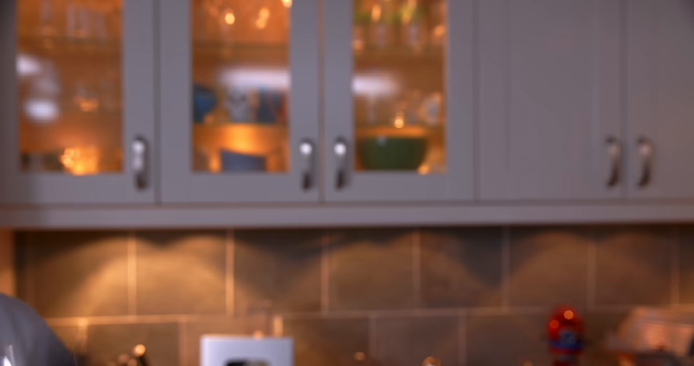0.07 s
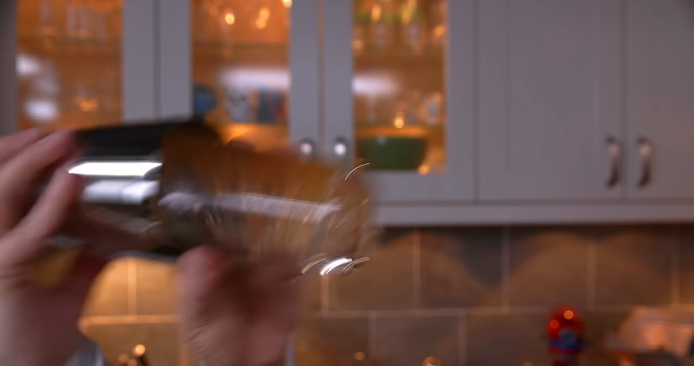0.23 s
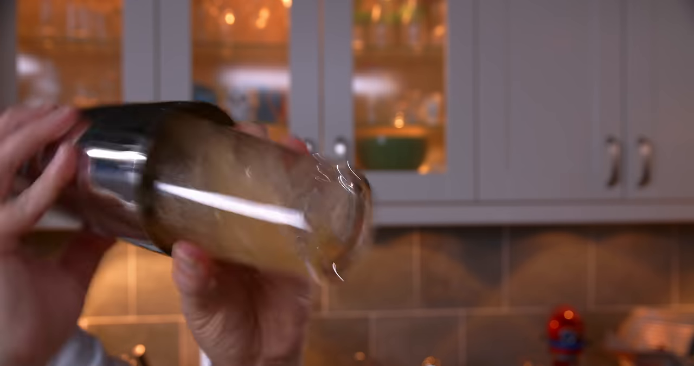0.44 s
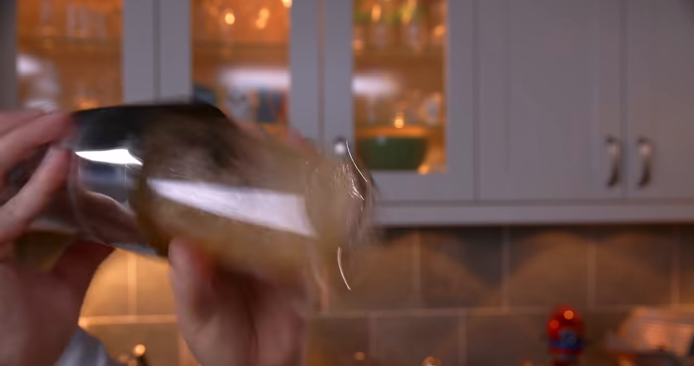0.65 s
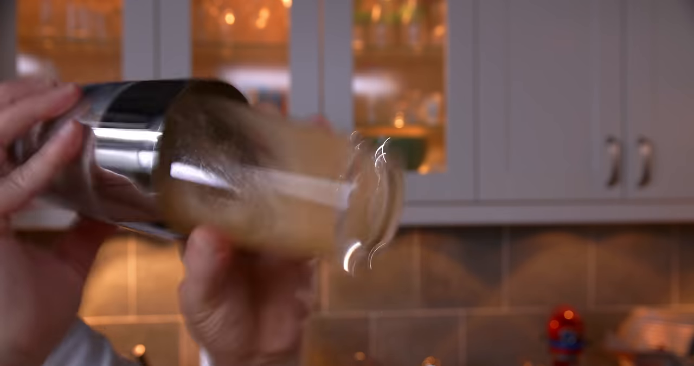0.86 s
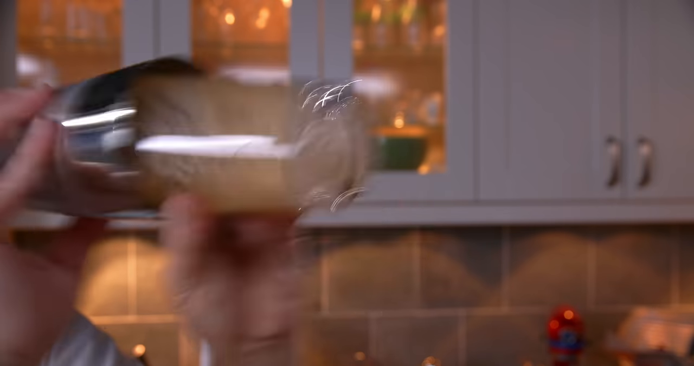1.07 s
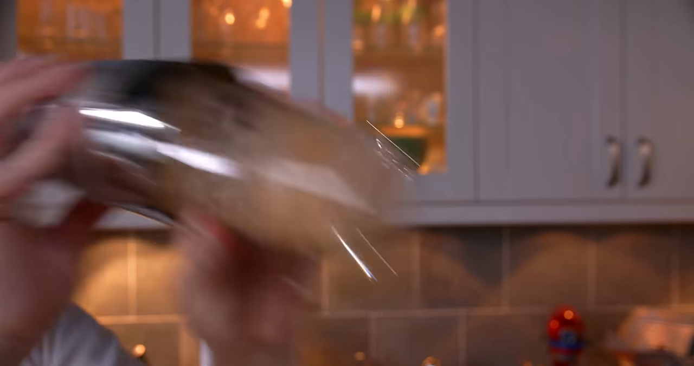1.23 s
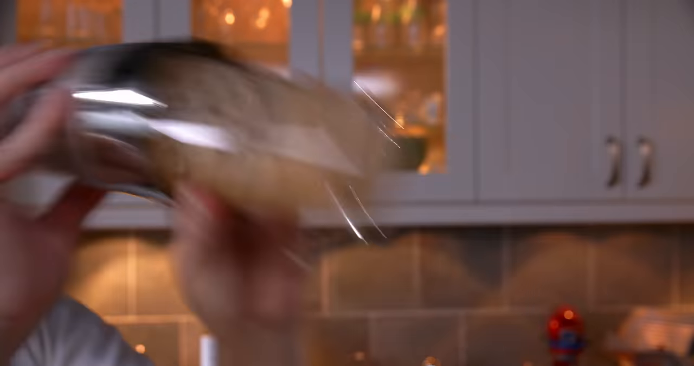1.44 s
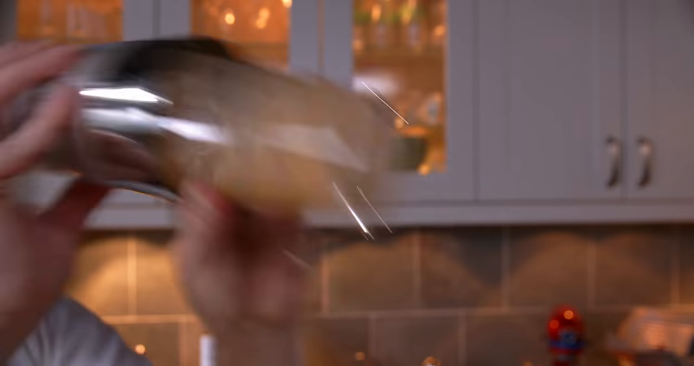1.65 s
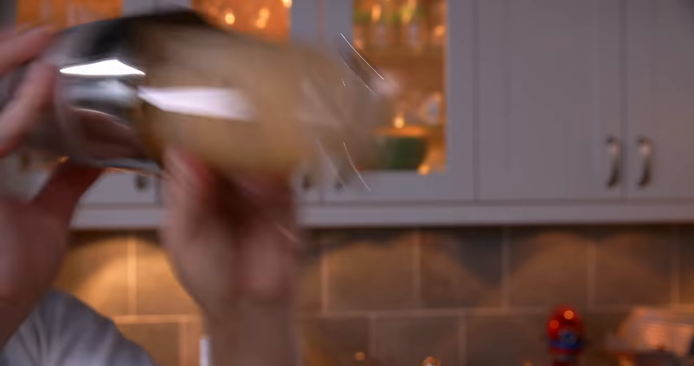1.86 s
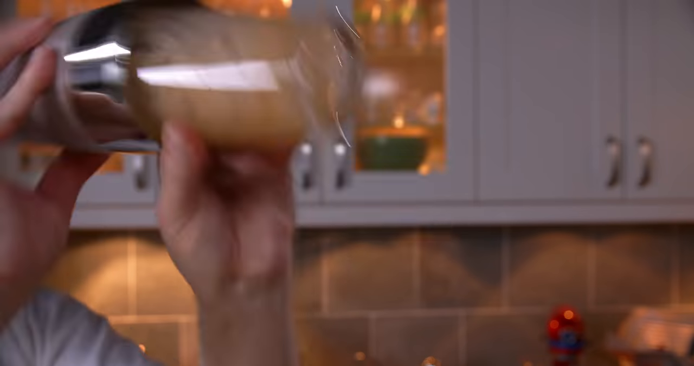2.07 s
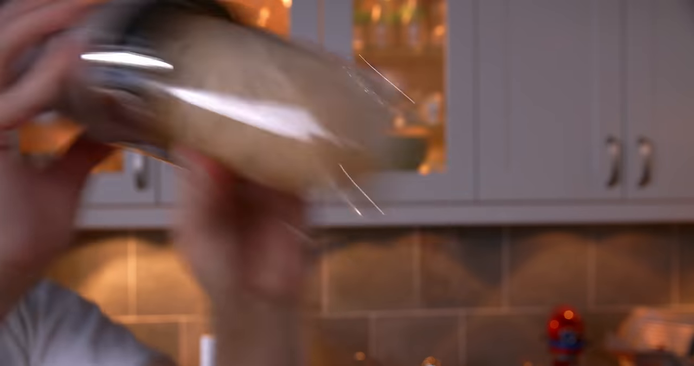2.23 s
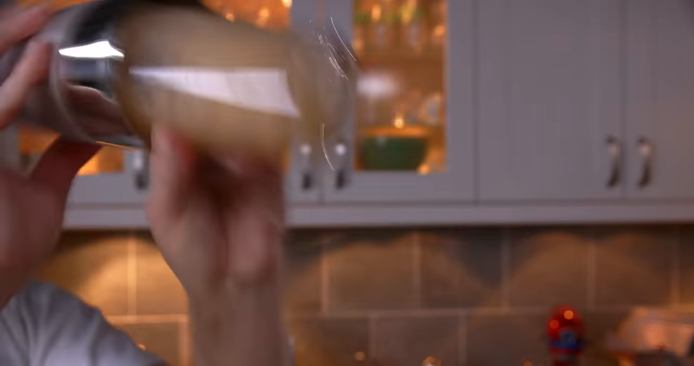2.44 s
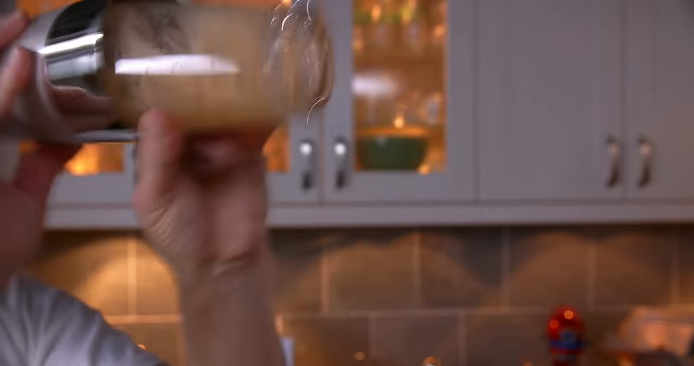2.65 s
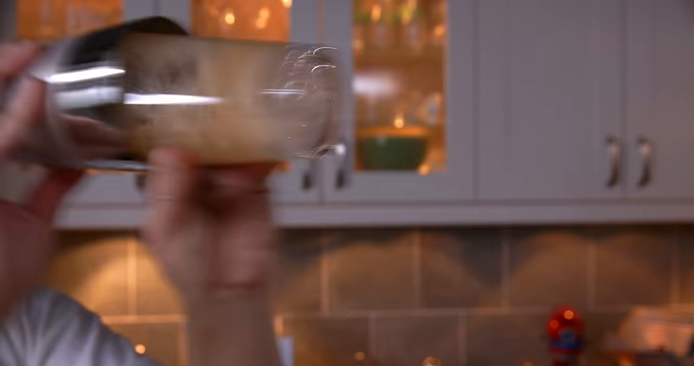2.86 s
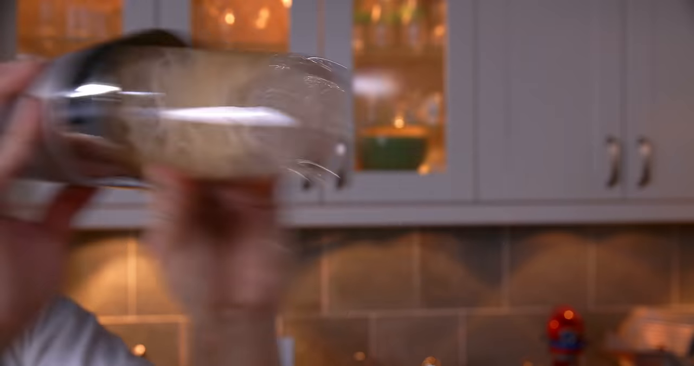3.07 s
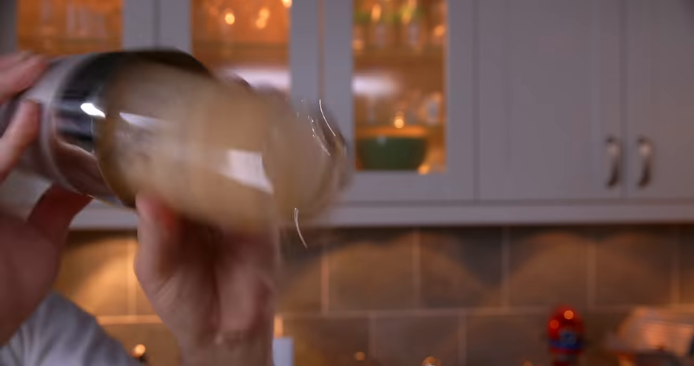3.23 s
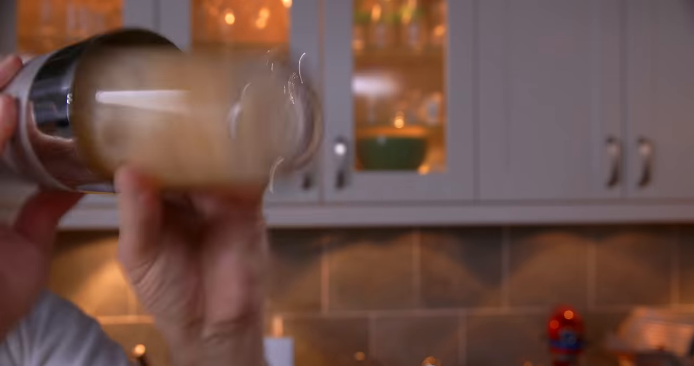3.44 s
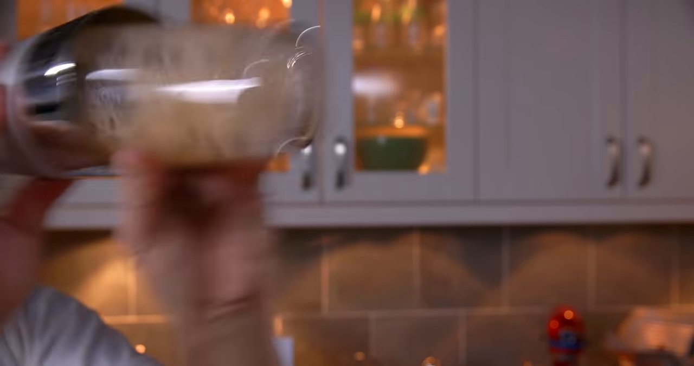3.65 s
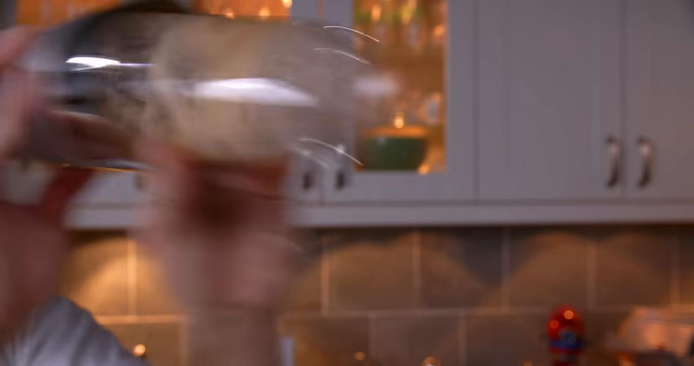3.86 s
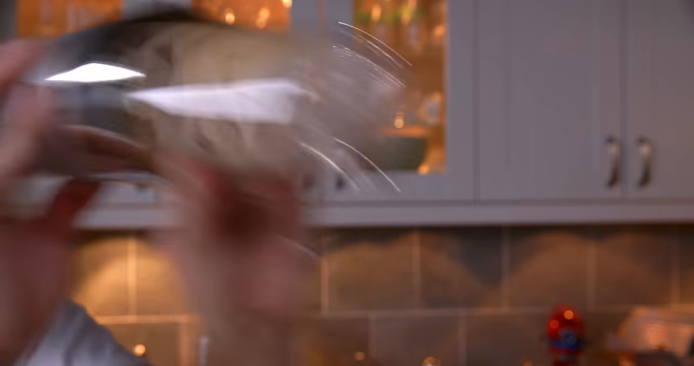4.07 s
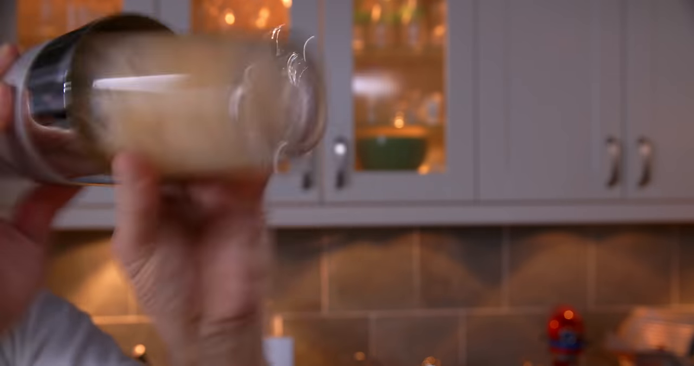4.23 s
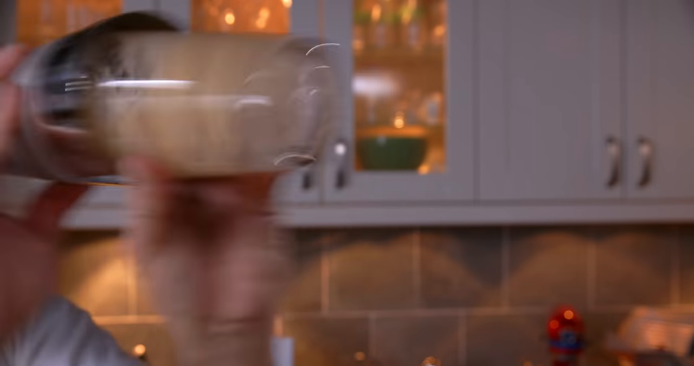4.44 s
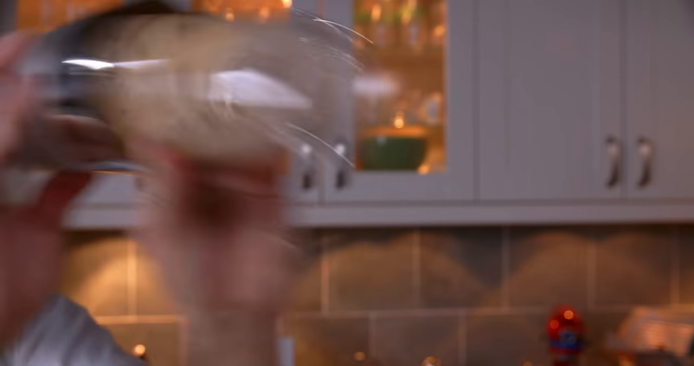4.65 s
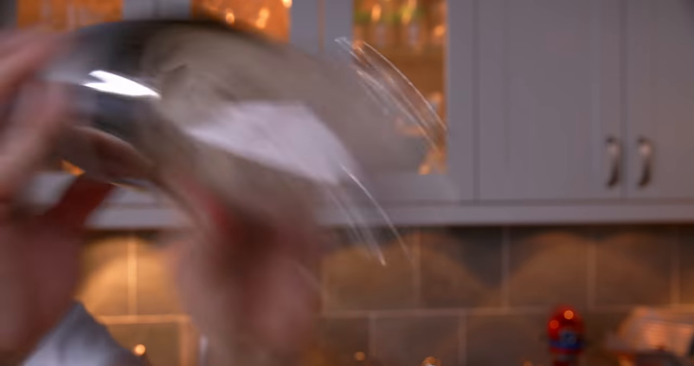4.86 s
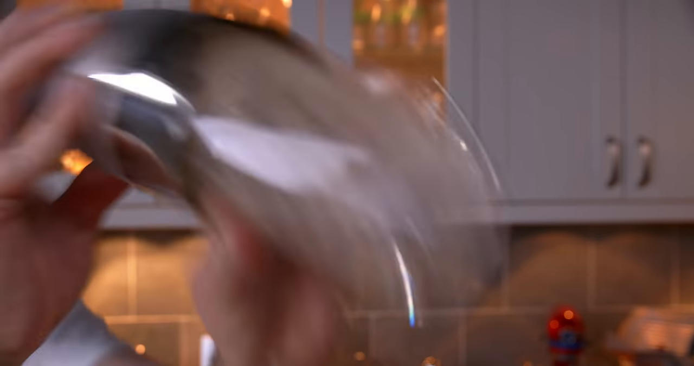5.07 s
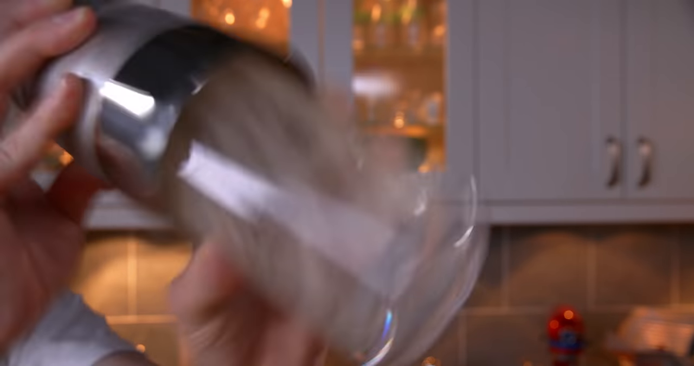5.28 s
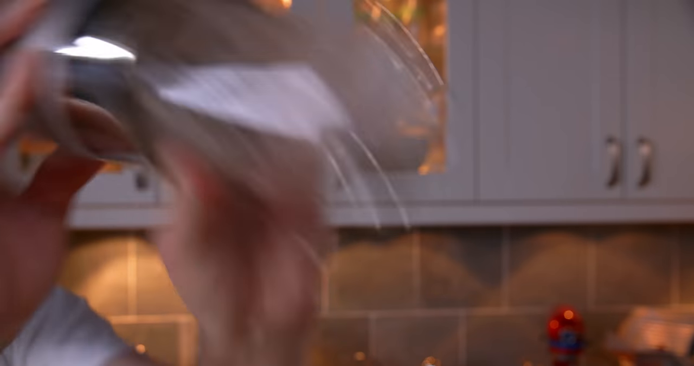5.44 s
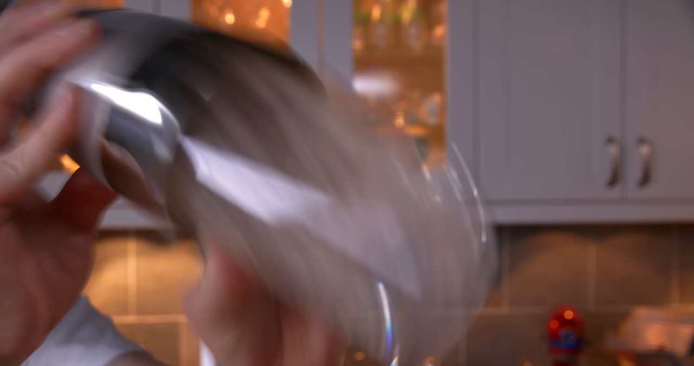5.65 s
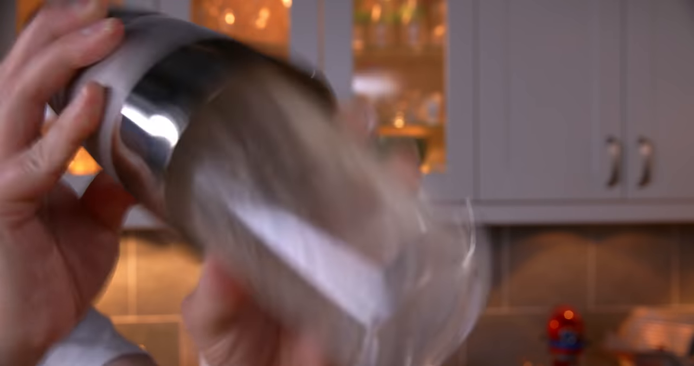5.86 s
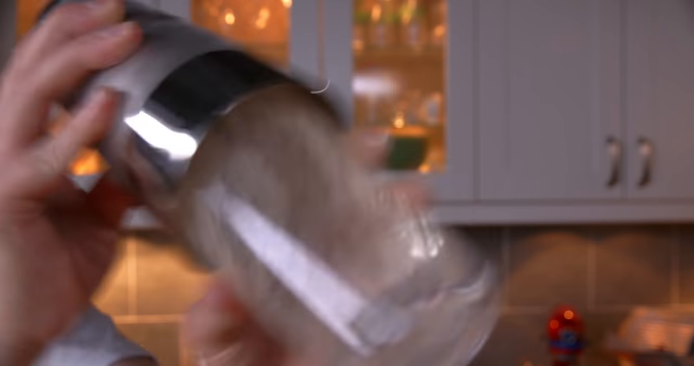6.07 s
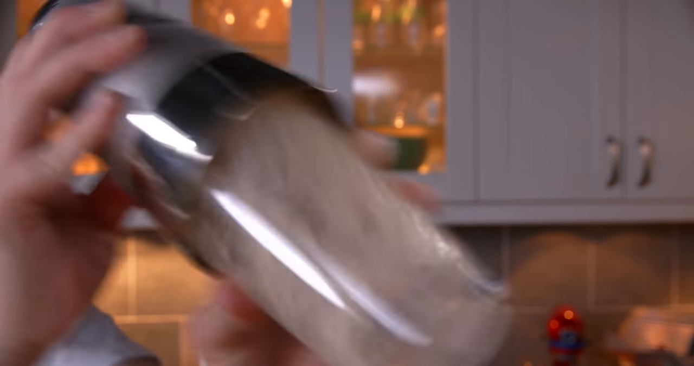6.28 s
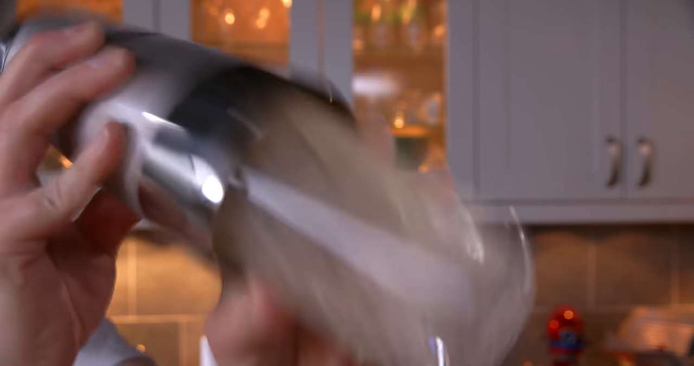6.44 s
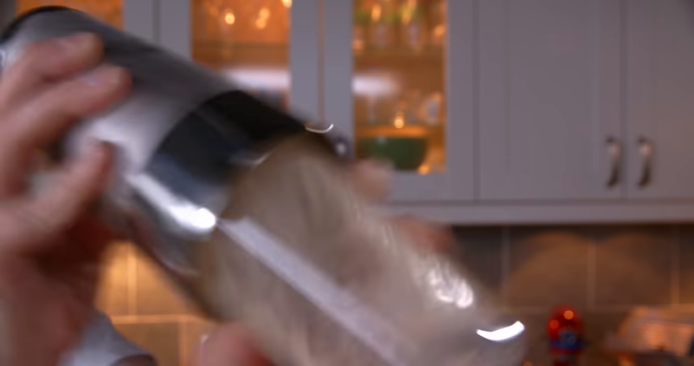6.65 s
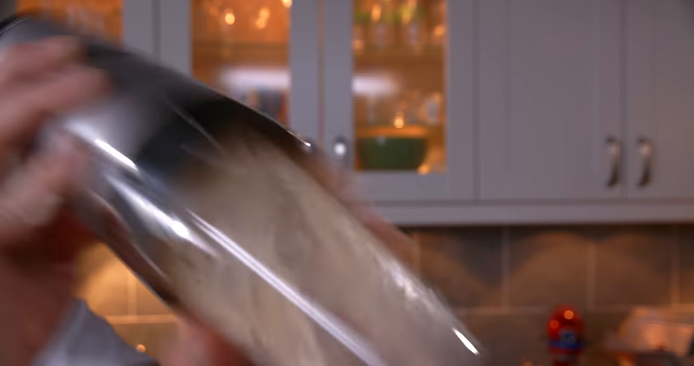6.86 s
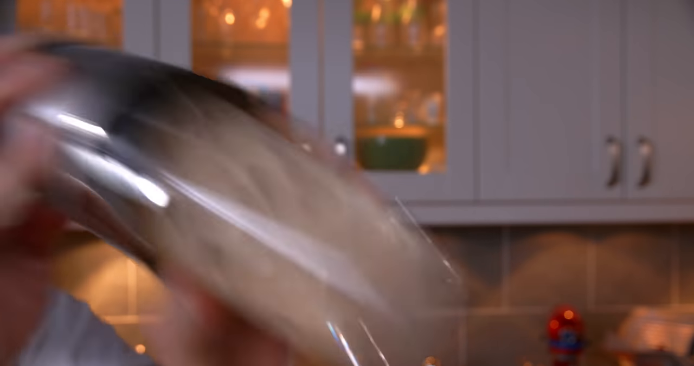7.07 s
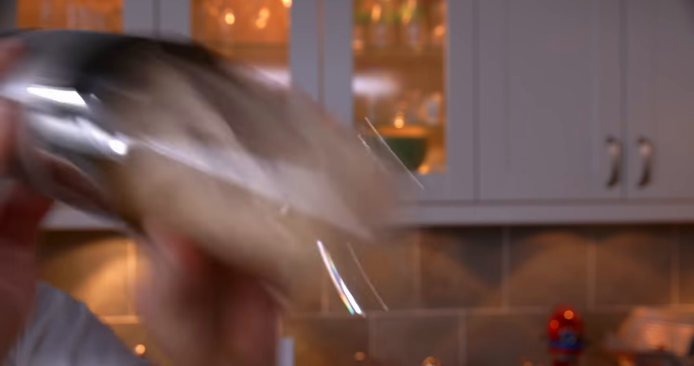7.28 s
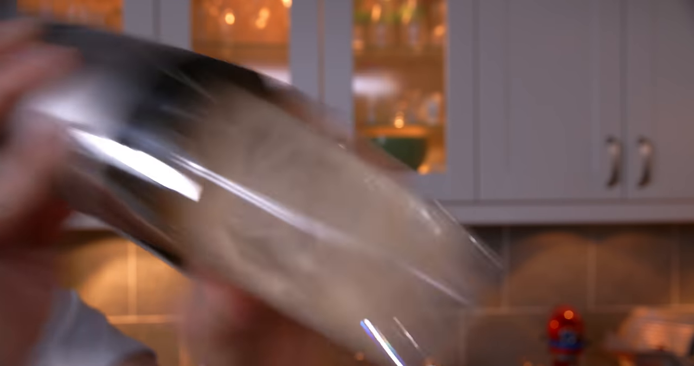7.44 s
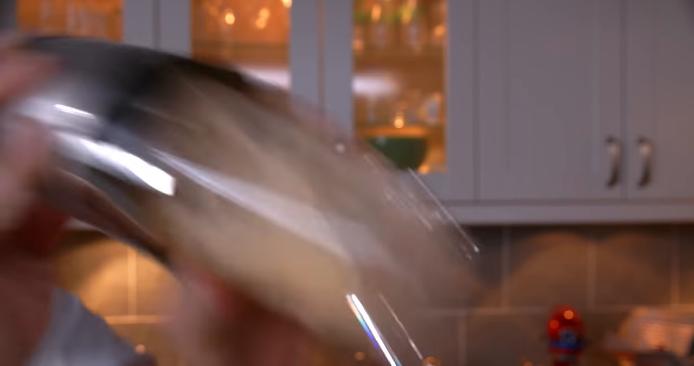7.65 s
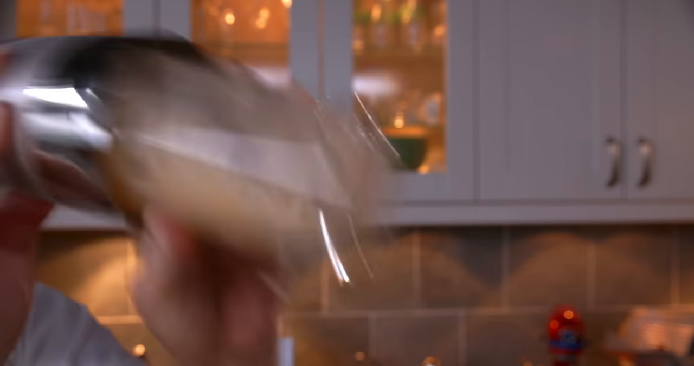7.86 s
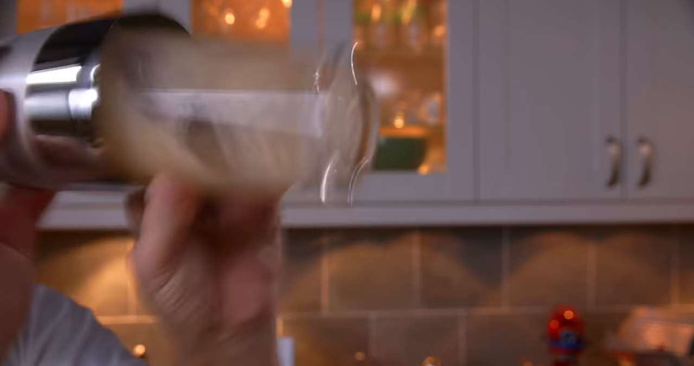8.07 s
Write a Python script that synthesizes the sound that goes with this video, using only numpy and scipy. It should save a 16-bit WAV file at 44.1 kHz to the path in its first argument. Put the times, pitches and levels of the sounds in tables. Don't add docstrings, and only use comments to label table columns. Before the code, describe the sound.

In a small, quiet kitchen, a hand-held metal tin capped by a glass and full of ice and drink is shaken hard, close to the microphone. From 0 to 0.3 seconds there is only faint room hush, tiny loose ice ticks and a brief soft rub along the wall. At about 0.35 the shaking bursts in and stays at roughly five shakes a second until the end near 8 seconds. Every shake has two hits about a tenth of a second apart, a louder throw and a softer return, each a dense shower of bright clicks around 2 to 9 kHz. Irregular cube slams, splintering cracks and hollow clunks stand out, with short damped metallic ringing near 3 kHz. Tumbling ice and slosh fill the gaps. Early strokes are sharpest; later ones slightly softer and slushier. Soft low air pushes lie beneath; the room tail is very short.

```python
import sys
import numpy as np
from scipy import signal
from scipy.fft import rfft, irfft
from scipy.io import wavfile

SR = 44100
rng = np.random.default_rng(int(sys.argv[2]) if len(sys.argv) > 2 else 0)


def to_wav(sig):
    pcm = np.clip(np.atleast_2d(sig), -1, 1) * 32767
    pcm = np.round(pcm).astype(np.int16)
    wavfile.write(sys.argv[1], SR, pcm.T)


def gain_from_decibels(decibels):
    exponent = np.asarray(decibels, float) / 20
    return 10 ** exponent


N = 357651

# frequency in Hz, density in dB per Hz.
HUSH_SPECTRUM = [(18, -55), (30, -12), (215, -3.5), (913, -19.5), (1460, -19), (7870, -26), (11100, -34),
                 (12300, -27), (16000, -54)]
# time in seconds, peak in dB.
JOLTS = [(1.039, -56), (1.345, -50), (1.541, -53), (1.903, -56), (1.992, -45), (2.344, -56.0), (2.53, -45),
         (2.725, -46), (2.96, -57.0), (3.144, -48), (3.462, -59), (3.717, -51), (4.306, -50.5),
         (4.503, -49), (4.701, -49), (4.893, -44), (5.084, -46), (5.279, -44), (5.465, -43), (5.659, -43),
         (6.242, -45), (6.439, -62), (6.632, -46), (7.014, -50), (7.206, -46), (7.399, -49), (7.589, -43),
         (7.97, -47)]
# time in seconds, level in dB.
SLIDE = [
    (.02, -73),
    (.13, -72),
    (.165, -51),
    (.22, -69),
    (.25, -45.5),
    (.33, -54),
    (.36, -71),
]
# frequency in Hz, bandwidth in Hz, level in dB.
FREE_WALL = [(1540, 87, -17), (2560, 26, -14), (2830, 55, -9), (3250, 72, -11.5), (4800, 570, -14)]
# time in seconds, level in dB.
TUMBLE = [(0, -64), (.1, -60), (.21, -52), (.295, -54), (.31, -33.5), (.45, -37), (.9, -29.5), (2, -33.5),
          (3, -32.5), (4, -30.5), (5.1, -34), (5.5, -33), (6.002, -32), (7, -34), (8.11, -33)]
# frequency in Hz, density in dB per Hz.
ICE_SPECTRUM = [(590, -44), (1000, -50), (1460, -35), (1620, -14), (1880, -3.5), (2190, -19.5), (3350, 4.5),
                (3810, -10), (9350, 1.5), (15700, -23)]
# frequency in Hz, density in dB per Hz.
DULL_SPECTRUM = [(88, -53), (150, -32), (308, -29), (441, -9), (625, -26), (906, 0.5), (1050, -19),
                 (1450, -1), (2200, -7.5), (2860, -47), (4840, -120)]
# frequency in Hz, level in dB, 60 dB decay time in seconds.
SHELL_MODES = [(1380, -14.5, 0.015), (1470, -22.5, 0.044), (1850, -13.5, 0.027), (2480, -14.5, 0.026),
               (2864, -7, 0.018), (3286, -11.5, 0.086), (3423, -4.5, 0.012), (4030, 2, 0.0035),
               (5100, -0.5, 0.0054), (6430, -3, 0.0034), (7600, -14, 0.022)]
# fall back of the ice into the tin in seconds, throw into the glass in dB, fall back in dB.
ARM = [(0.358, -14, -23), (0.968, -17, -20), (1.579, -14.5, -18.5), (2.181, -14.5, -21.5),
       (2.757, -16, -19), (3.359, -16.5, -20.5), (3.937, -16.5, -24), (4.539, -15, -22),
       (5.107, -19.5, -25.5), (5.676, -14.5, -20.5), (6.282, -19, -26), (6.839, -15.5, -21),
       (7.409, -18, -22.5), (7.99, -17, -26)]
# middle in seconds, hold in seconds, level above that rule in dB.
ODD_LOADS = [(0.455, 0.042, -1), (0.67, 0.045, -4), (0.359, 0.011, 2), (0.867, 0.078, 1.5),
             (0.964, 0.015, -4.5), (1.05, 0.055, 0.5), (1.17, 0.016, -2), (1.779, 0.01, -0.5),
             (1.98, 0.063, 0), (2.188, 0.045, 1), (2.567, 0.022, -1.5), (2.657, 0.043, -2),
             (3.449, 0.057, 0), (3.642, 0.053, 1.5), (3.737, 0.0063, -1.5), (4.037, 0.032, -0.5),
             (4.336, 0.029, 1), (4.624, 0.061, -2.5), (5, 0.074, 1), (5.304, 0.023, 3.5),
             (5.384, 0.054, 0.5), (5.667, 0.0062, -4.5), (6.159, 0.058, 0), (6.353, 0.028, 0),
             (6.473, 0.028, -2.5), (6.743, 0.038, -2.5), (7.12, 0.053, -0.5), (7.311, 0.033, -0.5),
             (7.505, 0.018, -1.5), (7.886, 0.06, -2.5)]
# time in seconds, level in dB.
CLACKS = [(0.3523, -12), (0.4395, -11), (0.471, -11), (0.5334, -13), (0.5748, -15), (0.6433, -15),
          (0.6503, -13.5), (0.6747, -7), (0.6909, -15), (0.6969, -11), (0.7095, -15), (0.7193, -25),
          (0.7796, -8.5), (0.8504, -10), (0.859, -10), (0.8762, -7), (0.8865, -9), (0.9051, -12),
          (0.9151, -15), (0.9281, -18), (0.9498, -8.5), (0.9625, -19), (0.9767, -12), (1.0137, -15),
          (1.0272, -14), (1.0398, -17), (1.1614, -19), (1.2145, -23), (1.2228, -11), (1.2458, -22),
          (1.2676, -8), (1.2788, -8), (1.3036, -13), (1.3126, -20), (1.3239, -12.5), (1.3562, -14),
          (1.3678, -16), (1.3994, -21), (1.4457, -6), (1.4602, -10), (1.5266, -9), (1.5618, -7),
          (1.5991, -11.5), (1.6062, -17), (1.6239, -32), (1.6504, -24), (1.6892, -7), (1.7, -10),
          (1.7197, -15), (1.7305, -16), (1.767, -14), (1.7767, -24), (1.8014, -11.5), (1.9258, -13),
          (1.9497, -23), (1.96, -15), (1.9995, -7), (2.0408, -23), (2.048, -20), (2.0802, -8),
            (2.1044, -11), (2.1147, -15), (2.1791, -13), (2.194, -17), (2.2317, -18), (2.2457, -22),
            (2.2723, -16), (2.2865, -14), (2.2983, -8), (2.3395, -13.5), (2.373, -16), (2.4467, -18),
            (2.457, -10), (2.5279, -13.5), (2.574, -22), (2.5834, -21), (2.6342, -8), (2.7418, -11.5),
            (2.8335, -28), (2.8522, -11), (2.8623, -10), (2.98, -30), (3.005, -11), (3.0096, -17),
            (3.0536, -14), (3.0836, -16), (3.096, -16), (3.108, -11.5), (3.172, -15), (3.216, -11),
            (3.225, -17), (3.2466, -6), (3.2868, -11), (3.3285, -13.5), (3.3483, -23), (3.4105, -10.5),
            (3.5307, -17), (3.57, -17), (3.6178, -13), (3.65, -18), (3.6824, -12), (3.6972, -13.5),
            (3.747, -18.5), (3.7556, -15), (3.8224, -15), (3.884, -14.5), (3.9167, -13), (3.96, -14),
          (4.1327, -13), (4.201, -13), (4.2214, -8), (4.232, -12), (4.239, -20), (4.282, -11),
            (4.3323, -9.5), (4.3473, -18), (4.4006, -20), (4.4198, -19), (4.429, -20), (4.448, -12),
            (4.5422, -14), (4.5883, -12.5), (4.6264, -14), (4.644, -20), (4.6855, -15), (4.723, -22),
            (4.7321, -20), (4.8065, -16), (4.828, -10), (4.903, -17), (4.9199, -14.5), (4.9748, -25),
            (4.9991, -12), (5.05, -19), (5.073, -25), (5.0951, -13.5), (5.11, -21), (5.17, -23),
            (5.1976, -6), (5.3114, -24), (5.3427, -15), (5.374, -15), (5.3826, -16), (5.3933, -9),
            (5.412, -13), (5.4173, -15), (5.4469, -14), (5.4703, -16), (5.4842, -17), (5.557, -16),
            (5.567, -8), (5.5793, -11), (5.6412, -12.5), (5.6839, -11.5), (5.749, -27), (5.768, -16),
            (5.7843, -11), (5.8005, -17), (5.8136, -15.5), (5.8579, -22), (5.8908, -27), (5.9894, -19),
          (5.9994, -27), (6.0338, -16.5), (6.0566, -13), (6.0818, -15), (6.1, -18), (6.2074, -12),
            (6.2758, -16.5), (6.3299, -13.5), (6.3593, -12), (6.3714, -9), (6.4567, -16), (6.5236, -16),
            (6.5327, -18), (6.5411, -9), (6.5677, -15), (6.5791, -23), (6.5953, -16), (6.6105, -22),
            (6.6255, -14), (6.646, -18), (6.666, -24), (6.6848, -23), (6.766, -14), (6.795, -19),
            (6.832, -7.5), (6.8516, -18), (6.871, -18), (6.915, -19), (6.9298, -11), (6.9484, -18),
            (6.966, -19), (6.9992, -22), (7.0287, -23), (7.1072, -15), (7.1255, -9), (7.2067, -21),
            (7.2916, -17), (7.401, -23), (7.4166, -24), (7.431, -19), (7.476, -12.5), (7.5168, -18),
            (7.5414, -18), (7.6091, -25), (7.6791, -9.5), (7.7059, -11), (7.722, -13), (7.7631, -14.5),
            (7.8966, -14), (7.9046, -13), (7.9544, -15), (8.0527, -17), (8.085, -22), (8.0967, -14)]
# time in seconds, peak in dB, pitch in Hz.
THUMPS = [(0.35, -28, 934), (0.427, -19, 770), (0.546, -25, 786), (1.33, -20, 860), (1.428, -18, 804),
          (1.751, -27, 942), (1.854, -12.5, 930), (2.045, -22, 724), (2.165, -20, 820), (2.54, -21, 947),
          (2.678, -16, 805), (2.962, -21, 770), (3.551, -19, 705), (3.736, -28, 947), (4.331, -28, 759),
          (4.731, -33, 902), (5.297, -18, 835), (5.49, -18, 821), (5.667, -13, 865), (5.978, -17, 851),
          (6.067, -14, 900), (6.722, -24, 820), (7.512, -14, 1070), (8.038, -20.5, 930),
          (0.466, -18, 800), (0.844, -22, 649), (0.894, -29, 816), (1.035, -26, 678), (1.065, -19, 818),
         (1.17, -24, 683), (1.255, -17, 817), (1.287, -30, 734), (1.365, -20, 815), (1.444, -22, 767),
         (1.657, -20, 765), (2.064, -27, 756), (2.372, -20, 700), (2.44, -20, 750), (2.588, -23, 730),
         (2.643, -19, 725), (3.034, -27, 655), (3.629, -26, 773), (4.331, -19, 740), (4.433, -20, 722),
         (5.669, -21, 590), (7.208, -23, 773), (7.406, -23, 810), (8.057, -29, 750)]
# time in seconds, peak in dB, pitch in Hz.
CLUNKS = [(0.1654, -25, 1560), (0.3624, -17, 1570), (0.4261, -14, 1930), (1.1448, -8, 1530),
          (1.3663, -10, 1470), (1.7752, -2, 1540), (1.8415, -9, 1480), (1.8543, -14, 1700),
          (1.9988, -6.5, 1470), (2.6767, -3, 1730), (2.9631, -11.5, 1480), (3.4215, -6, 1880),
          (3.8523, -1, 1890), (3.9583, -9, 1890), (4.3316, -15, 1230), (4.391, -13, 1290),
          (4.8248, -4, 1890), (5.1561, -10, 1470), (5.1876, -6, 1800), (5.5871, -3, 1780),
          (5.945, -6, 1450), (5.9798, -4, 1910), (6.1431, -4.5, 1850), (6.5466, -9, 1280),
          (6.7499, -5, 2060), (6.9648, -8.5, 1490), (6.9926, -7, 1780), (7.016, -10, 1770),
          (7.6777, -11, 1870), (7.8832, -17, 1390), (7.9036, -12, 1890)]
# time in seconds, peak in dB, contact pitch in Hz.
CRACKS = [(0.028, -45, 7800), (0.056, -45, 12500), (0.0708, -43, 7070), (0.1078, -40, 8850),
          (0.118, -42, 9000), (0.1265, -34, 7660), (0.1468, -34, 4500), (0.1666, -22.5, 2930),
          (0.192, -38, 10500), (0.2054, -31, 3520), (0.2265, -34, 9000), (0.2505, -32, 2600),
          (0.3052, -19, 8450), (0.3132, -9, 3530), (0.352, -19, 4180), (0.3667, -5.5, 2950),
          (0.377, -6, 7400), (0.4264, 3, 4700), (0.468, 3, 3580), (0.4816, 0, 4000),
          (0.5175, -8, 3400), (0.5476, -11, 2860), (0.5756, -9, 9090),
          (0.6892, 0.5, 6700), (1.1558, -3, 9300), (1.844, -7, 4700), (1.8715, 0, 6910),
             (1.971, -3, 7600), (2.389, -6.5, 7750), (2.4342, -5, 6800), (2.682, 1, 2700),
             (2.8915, -3.5, 5360), (2.9637, -3, 7450), (3.2589, -1, 4760), (3.4225, -7, 5300),
             (3.4571, 0, 5430), (3.8513, 1, 4870), (4.073, 0, 4950), (4.191, -5, 9610), (4.6357, 2, 5100),
             (5.0153, -5.5, 3970), (5.043, -4, 5370), (5.163, -4, 6700), (5.21, 1.5, 4220),
             (5.2792, -9, 9100), (6.177, -5, 6250), (6.331, -8.5, 9700), (6.5322, -9, 8090),
             (6.577, 0, 5100), (6.78, -4.5, 4000), (7.1247, -3, 7970), (7.136, -2, 5630), (7.316, -8, 8600),
          (1.3825, -2.5, 7440), (2.536, -12, 5400), (2.5554, -12, 5310), (2.618, -9, 9350),
          (3.0037, -19, 3250), (3.492, -9.4, 6570), (3.5914, -12, 4860), (3.863, -5, 5300),
          (4.576, -11, 4060), (4.671, -9, 6450), (4.7853, -10, 9400), (5.364, -10, 9120), (5.766, -8, 4000),
          (6.7087, -12, 4600), (7.099, -14, 6100), (7.297, -14, 5250), (7.4876, -7, 4130),
          (7.794, -8, 4160), (7.968, -8, 3050)]
# time in seconds, peak in dB.
TAPS = [(.976, -5), (1.0963, -1), (1.1693, 1), (1.5531, -1), (1.673, 2), (1.754, -3), (1.9916, -1),
        (1.9995, -9), (2.135, -2), (2.1672, -3), (2.8751, -1.5), (3.3354, -5), (4.22, -2), (4.2809, -8),
        (4.3115, -4), (4.6086, -3), (4.8275, -5), (5.0002, -6), (5.103, -4), (5.1569, -4), (5.1886, -1),
        (5.1963, -11), (6.5397, -31), (6.9377, 2), (6.9922, -2), (7.091, -3.5), (7.186, -6.5),
        (7.4006, -4.5), (7.6776, -17)]
# time in seconds, peak in dB.
SLAMS = [(.7095, 4.5), (.8683, 7), (1.0868, -0.5), (1.2591, 5), (1.2683, -9), (1.2974, 3), (1.47, 7),
         (1.492, 2.5), (1.5393, -3), (1.6648, 6), (1.7115, 1.5), (1.89, 5.5), (1.895, 3), (2.089, 2),
         (2.6276, -1), (2.8635, -2), (3.0367, 8.5), (3.239, -6), (3.8214, 0), (4.044, 4.5), (4.061, 4.5),
         (4.3927, 3.5), (4.4353, 4), (5.589, 6), (5.9293, 0), (5.9804, 8), (6.1445, -2), (6.3788, 4.5),
         (6.388, 3), (6.7507, 5.5)]

HUSH_DB, KITCHEN_T60_S, WALL_CUT_HZ = -60, 0.12, 12000
SMALL_BODY_HZ, CUTOFF_HZ = 1050, 15760
LOAD_SHIFT = 0.023
THROW_LAG_S, HOLD_S = 0.094, 0.054
THROW_DULL_DB, BACK_DULL_DB = -12.5, -8.5
CLACK_T60_S = 0.012
SLAM_HZ, TAP_HZ = 3460, 3070
SLAM_SCATTER, TAP_SCATTER = 0.016, 0.071


def rms_one(x):
    return x / np.sqrt(np.mean(x ** 2) + 1e-20)


def at_hz(points, hz):
    rows = np.array(points)
    return np.interp(np.log(hz), np.log(rows[:, 0]), rows[:, 1])


def band(x, low_hz, high_hz):
    return signal.sosfilt(signal.butter(2, [low_hz, high_hz], "band", fs=SR, output="sos"), x)


def high_pass(x, hz):
    return signal.sosfilt(signal.butter(4, hz, "high", fs=SR, output="sos"), x)


def ring(clicks, hz, t60):
    radius = gain_from_decibels(-60 / (t60 * SR))
    angle = 2 * np.pi * hz / SR
    return signal.lfilter([0.5, 0, -0.5], [1, -2 * radius * np.cos(angle), radius ** 2], clicks + 1e-18)


def clicks_at(rows, level_db):
    out = np.zeros(N)
    samples = (np.array(rows)[:, 0] * SR).astype(int)
    out[np.minimum(samples, N - 1)] = gain_from_decibels(level_db)
    return out


def drift(rate):
    knots = rng.uniform(-1.7, 1.7, 1000)
    return np.interp(np.arange(N) * rate / SR, np.arange(len(knots)), knots)


def hush():
    hz = np.maximum(np.arange(N // 2 + 1) * SR / N, 10)
    spectrum = rfft(rng.standard_normal(N)) * gain_from_decibels(at_hz(HUSH_SPECTRUM, hz))
    return gain_from_decibels(HUSH_DB) * rms_one(irfft(spectrum, N))


def kitchen(x):
    out = np.zeros(N)
    dull = np.exp(-2 * np.pi * WALL_CUT_HZ / SR)
    lags = (rng.uniform(0.012, 0.031, size=10) * SR).astype(int)
    for k, lag in enumerate(lags):
        loop, state = x.copy(), [0.]
        gain = gain_from_decibels(-60 * lag / SR / KITCHEN_T60_S)
        for i in range(lag, N, lag):
            back, state = signal.lfilter([gain * (1 - dull)], [1, -dull], loop[i - lag:i], zi=state)
            loop[i:i + lag] += back[:N - i]
        out += (loop - x) * (-1) ** k
    return out


def jolts():
    age = np.arange(-1024, 1025) / SR
    push = np.exp(-(age / 0.0036) ** 2) * np.sin(2 * np.pi * 60 * age)
    return signal.fftconvolve(clicks_at(JOLTS, np.array(JOLTS)[:, 1] + 2.0), push, "same")


def slide():
    s, db = np.transpose(SLIDE)
    level = gain_from_decibels(np.interp(np.arange(N) / SR, s, db, left=-150, right=-150))
    rub = rng.standard_normal(N) * level
    out = 0
    for hz, width_hz, level_db in FREE_WALL:
        gain = gain_from_decibels(level_db) * 30 * np.sqrt(width_hz / SR)
        out = out + gain * ring(rub, hz, 0.55 / width_hz)
    return out


def shell(clicks, spread_db):
    out = 0
    for hz, db, t60 in SHELL_MODES:
        strengths = clicks * gain_from_decibels(db + spread_db * rng.uniform(-3.38, 1.7, N))
        load = rng.integers(-2, 3, size=N)
        for k in range(-2, 3):
            out = out + ring(strengths * (load == k), hz * (1 + LOAD_SHIFT * k), t60)
    return out


def clacks(per_s, t60, spread_db, between_db):
    meetings = (rng.random(N) < per_s / SR) * gain_from_decibels(2 * spread_db * rng.uniform(-1.7, 1, N))
    power = signal.lfilter([1], [1, -gain_from_decibels(-120 / (t60 * SR))], meetings + 1e-18)
    return rms_one(np.sqrt(power + gain_from_decibels(2 * between_db)))


def grains(spectrum, flurry, per_s, spread_db, cycles, patchy_db, ragged, count):
    sizes = gain_from_decibels(spread_db * np.minimum(rng.exponential(1, N), 2.4)) * rng.choice([-1, 1], N)
    clicks = flurry * sizes * (rng.random(N) < per_s / SR)
    dealt = rng.integers(0, count, N)
    pitches = np.geomspace(spectrum[1][0], min(spectrum[-2][0], 0.45 * SR), count)
    rings = 0
    for k, hz in enumerate(pitches):
        if k % 7 == 0:
            meetings = clacks(per_s=150, t60=0.011, spread_db=2.5, between_db=-11.0)
            patch = gain_from_decibels(patchy_db * drift(40.0)) * meetings ** ragged
        tone = rms_one(ring(clicks * (dealt == k) * patch, hz, cycles / hz))
        rings = rings + gain_from_decibels(at_hz(spectrum, hz)) * np.sqrt(hz) * tone
    return rms_one(rings), rms_one(clicks)


def strokes():
    shakes = np.arange(40)
    back_s, throw_db, back_db = (np.interp(shakes, 3 * np.arange(14), c) for c in np.transpose(ARM))
    middle = np.r_[back_s, back_s + THROW_LAG_S]
    level = np.r_[back_db, throw_db]
    hold = np.full(len(middle), HOLD_S)
    dull = np.repeat([BACK_DULL_DB, THROW_DULL_DB], len(back_s))
    for s, hold_s, db in ODD_LOADS:
        k = np.argmin(abs(middle - s))
        middle[k], hold[k] = s, hold_s
        level[k] += db
    level = level - 10 * np.log10(hold / HOLD_S)
    return np.c_[middle - hold / 2, hold, level, dull]


def pile_up(table, level_db, rise_s, fall_s):
    t, power = np.arange(0, N, 32) / SR, 0
    for (s, length, *_), db in zip(table, level_db):
        early = np.maximum(s - t, 0) / rise_s
        late = np.maximum(t - s - length, 0) / fall_s
        power = power + gain_from_decibels(2 * np.maximum(db - 10 * (early + late), -150))
    return np.interp(np.arange(N) / SR, t, np.sqrt(power))


def shower():
    table, rows = strokes(), np.array(TUMBLE)
    tumble = gain_from_decibels(np.interp(np.arange(N) / SR, rows[:, 0], rows[:, 1]))
    bright = np.hypot(pile_up(table, table[:, 2] - 8.5, 0.011, 0.017), tumble)
    dull_db = table[:, 2] + table[:, 3] - 4.5
    dull = np.hypot(pile_up(table, dull_db, 0.0035, 0.016), tumble * gain_from_decibels(-9.0))

    flurry = clacks(per_s=240, t60=0.021, spread_db=2.5, between_db=-5.0)
    chips, clicks = grains(ICE_SPECTRUM, flurry, per_s=9000, spread_db=3.5, cycles=6.6,
                           patchy_db=2.0, ragged=0.82, count=40)
    rolling = clacks(per_s=90, t60=0.036, spread_db=2.2, between_db=-7.0)
    knocks, _ = grains(DULL_SPECTRUM, rolling * flurry ** 0.9, per_s=3500, spread_db=4.0, cycles=8.8,
                       patchy_db=2.5, ragged=0.7, count=28)
    hardness = np.minimum(bright / gain_from_decibels(-30), 1) ** 0.45
    ringing = gain_from_decibels(-26.5) * shell(clicks * bright * (bright / gain_from_decibels(-38)) ** 0.49, spread_db=5.5)
    return bright * hardness * chips * gain_from_decibels(-0.5) + ringing, dull * knocks


def clatter():
    rows = CLACKS
    power = clicks_at(rows, 2 * np.array(rows)[:, 1])
    burst = np.sqrt(signal.lfilter([1], [1, -gain_from_decibels(-120 / (CLACK_T60_S * SR))], power + 1e-18))
    chips, clicks = grains(ICE_SPECTRUM, burst, per_s=14000, spread_db=2.5, cycles=8.0,
                           patchy_db=3.0, ragged=0, count=40)
    knocks, _ = grains(DULL_SPECTRUM, burst, per_s=5000, spread_db=0.5, cycles=8.8,
                       patchy_db=2.0, ragged=0, count=28)
    ringing = shell(clicks, spread_db=5.5)
    burst_rms = np.sqrt(np.mean(burst ** 2))
    return burst_rms * (gain_from_decibels(-5.0) * chips + gain_from_decibels(-15.0) * knocks + gain_from_decibels(-22.0) * ringing)


def on_wall(rows, hz, scatter):
    return [(s, db, hz * (1 + scatter * u)) for (s, db), u in zip(rows, rng.uniform(-1.17, 1, len(rows)))]


def blows(rows, contact_s, cycles, rough_db, rough_t60, low, high):
    length = 1536
    out, age = np.zeros(N + length), np.arange(length) / SR
    contact = 1 - np.exp(-age / contact_s)
    for (s, db, hz), noise in zip(rows, rng.standard_normal((len(rows), length))):
        tone = gain_from_decibels(-60 * age * hz / cycles) * np.sin(2 * np.pi * hz * age)
        rough = gain_from_decibels(rough_db - 60 * age / rough_t60) * band(noise, low * hz, min(high * hz, 15000))
        start = int(s * SR)
        out[start:start + length] += contact * gain_from_decibels(db) * (tone + rough)
    return out[:N]


def cubes():
    chips = CRACKS
    strikes = on_wall(SLAMS, SLAM_HZ, SLAM_SCATTER) + on_wall(TAPS, TAP_HZ, TAP_SCATTER)
    cracks = gain_from_decibels(-4.0) * blows(chips, contact_s=0.0001, cycles=33.0, rough_db=0.0,
                               rough_t60=0.023, low=0.64, high=1.43)
    slams = gain_from_decibels(-7.5) * blows(strikes, contact_s=0.0003, cycles=32.0, rough_db=1.0,
                              rough_t60=0.015, low=0.48, high=2.2)
    clunks = gain_from_decibels(-4.5) * blows(CLUNKS, contact_s=0.001, cycles=25.5, rough_db=2.0,
                               rough_t60=0.018, low=0.28, high=0.39)
    thumps = gain_from_decibels(2.5) * blows(THUMPS, contact_s=0.0018, cycles=10.3, rough_db=3.0,
                              rough_t60=0.022, low=0.39, high=1.6)
    rows = chips + strikes
    ringing = gain_from_decibels(-21.0) * shell(clicks_at(rows, np.array(rows)[:, 1]), spread_db=9.5)
    return cracks + slams + ringing, clunks + thumps


def scene():
    chips, knocks = shower()
    cracks, thuds = cubes()
    shaker = high_pass(chips + cracks + clatter(), SMALL_BODY_HZ) + high_pass(knocks + thuds, 95)
    mix = shaker + gain_from_decibels(-13.5) * kitchen(shaker) + slide() + jolts() + hush()
    return mix[None]


def top_cut(x):
    return signal.sosfilt(signal.butter(12, 16680, fs=SR, output="sos"), x)


def record(dry):
    rounded = 0.9 * np.tanh(dry / 0.9)
    cut = signal.ellip(12, 0.5, 70, CUTOFF_HZ, fs=SR, output="sos")
    return top_cut(signal.sosfilt(cut, rounded))


dry = scene()
out = record(dry)
to_wav(out)
```